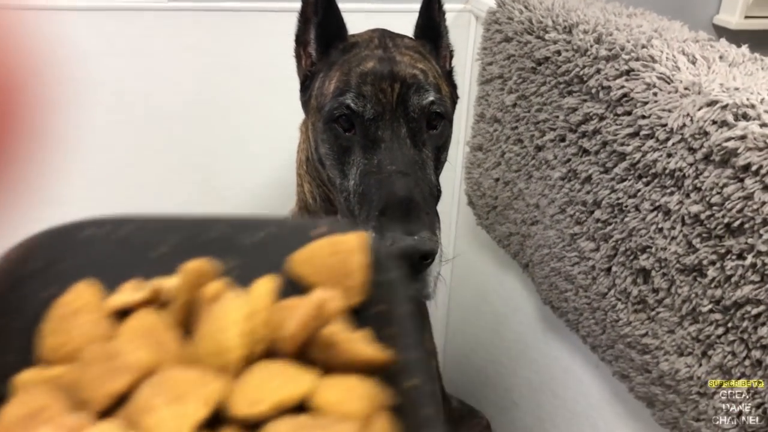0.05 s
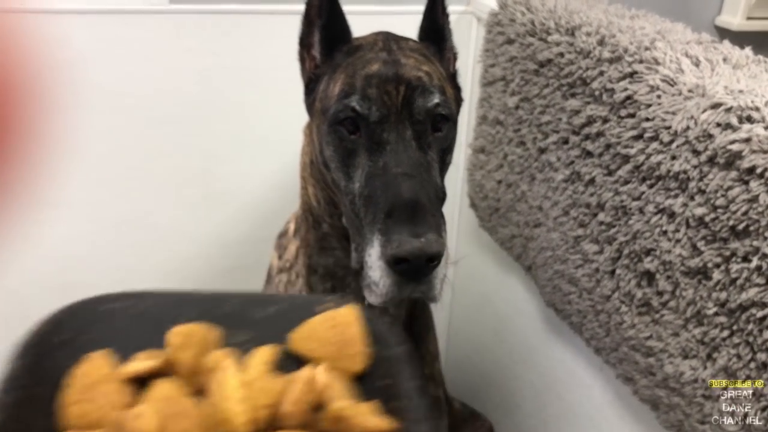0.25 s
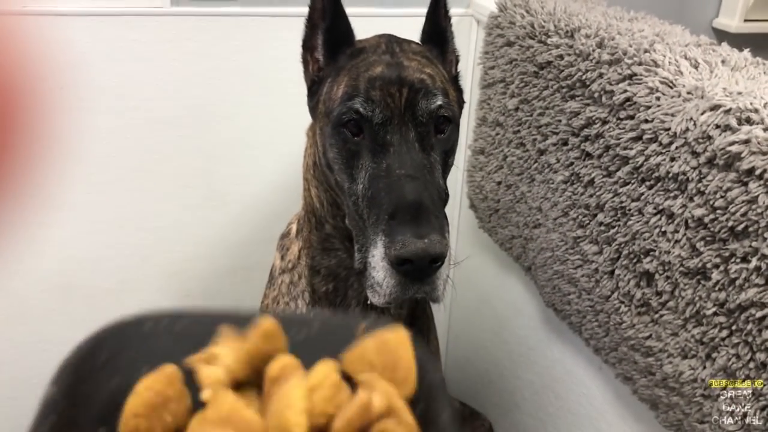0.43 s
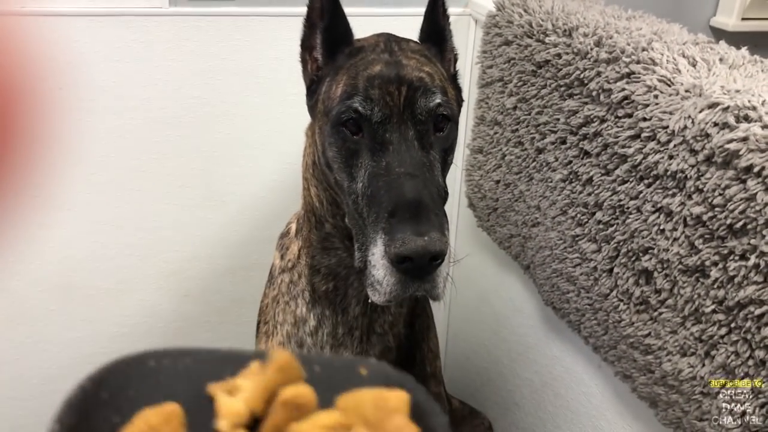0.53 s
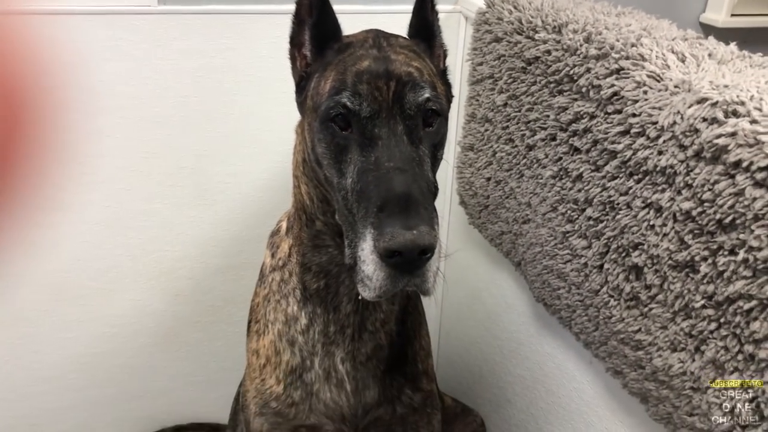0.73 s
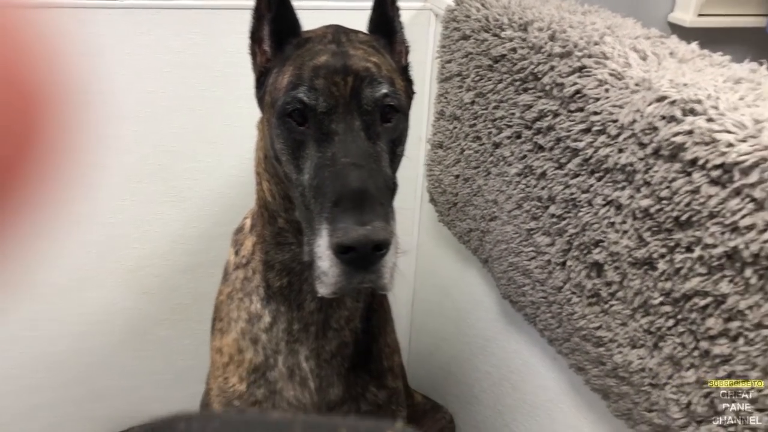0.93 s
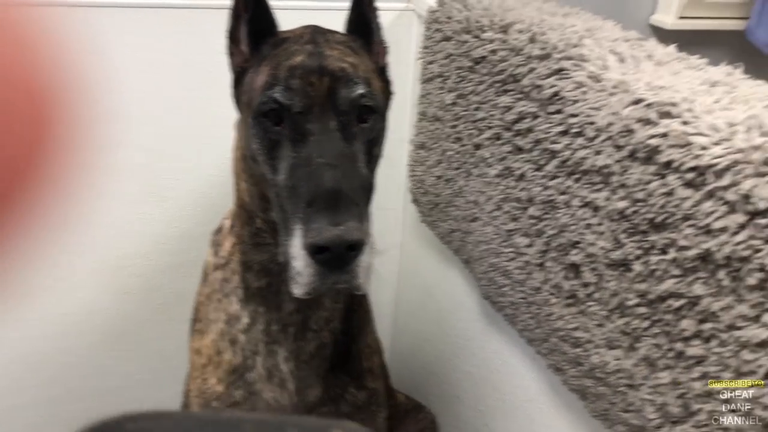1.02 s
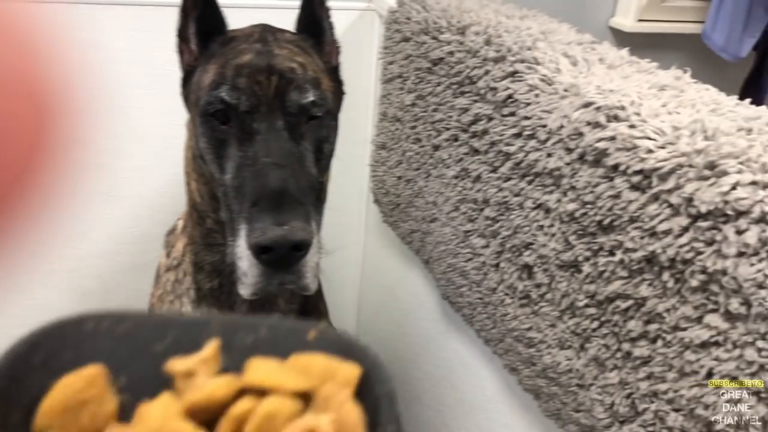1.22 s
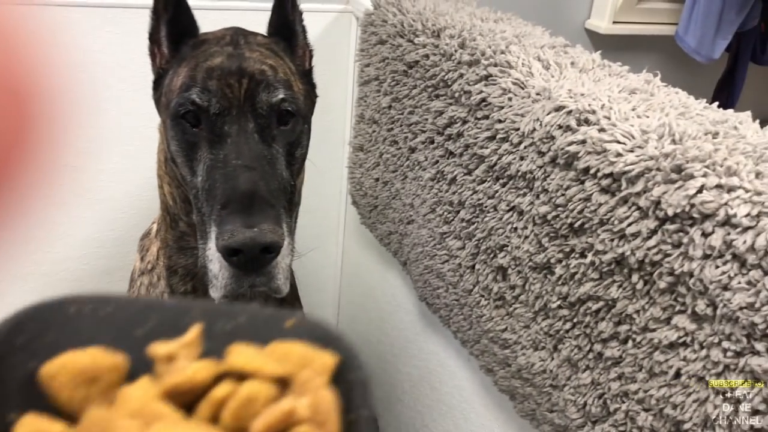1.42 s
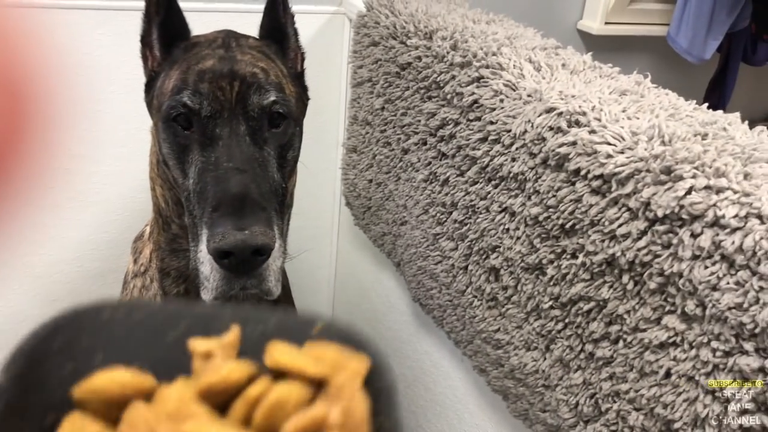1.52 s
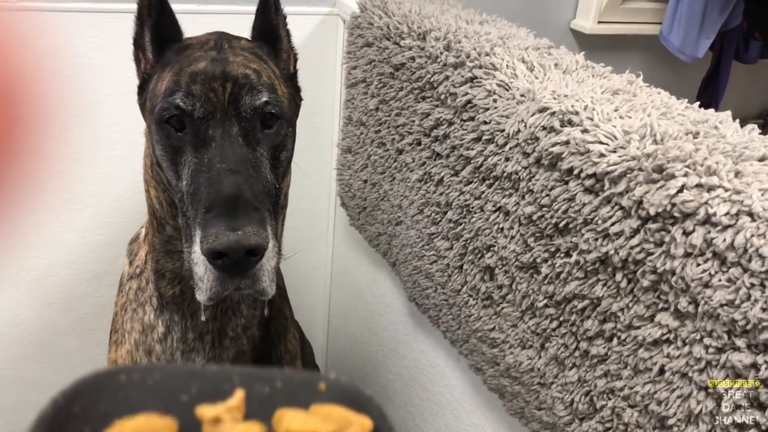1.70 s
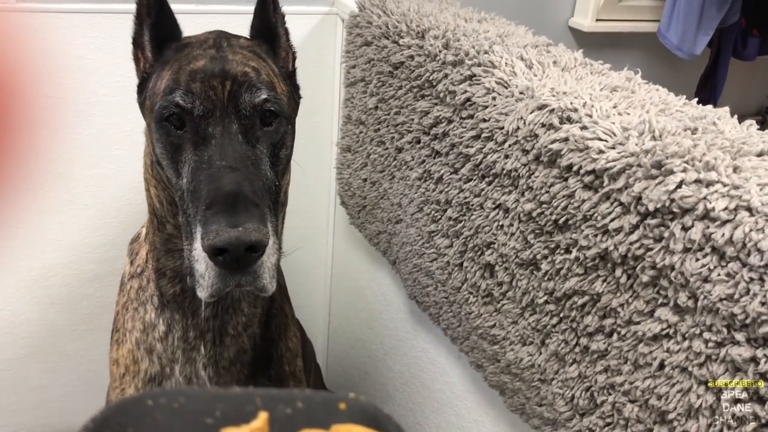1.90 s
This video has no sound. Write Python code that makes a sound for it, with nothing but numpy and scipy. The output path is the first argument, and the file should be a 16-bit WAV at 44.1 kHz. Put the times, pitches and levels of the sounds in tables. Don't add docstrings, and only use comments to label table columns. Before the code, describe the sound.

Hard dry kibble rattles in a plastic scoop, a quick busy burst thinning to scattered knocks.

```python
import sys
import numpy as np
from scipy import signal
from scipy.io import wavfile
from scipy.ndimage import uniform_filter1d

SR = 44100
rng = np.random.default_rng(int(sys.argv[2]) if len(sys.argv) > 2 else 0)


def to_linear_factor(level_db):
    exponent = np.asarray(level_db, float) / 20
    return 10 ** exponent


def persist_wave(psi):
    counts = np.round(np.clip(psi, -1, 1) * 32767).astype(np.int16)
    wavfile.write(sys.argv[1], SR, np.atleast_2d(counts).T)


N = 85995

# (time [s], level [dB], pitch [Hz], swell [cycles])
POURING_KNOCKS = [(0.0896, -31.5, 1284, 0.43), (0.14437, -57.5, 1310, 0.68), (0.17, -59, 1540, 2.6),
                  (0.212, -42.5, 1400, 1.3), (0.2144, -27.5, 1290, 0.72), (0.21516, -41, 920, 1.3),
                  (0.22196, -29.5, 1330, 0.62), (0.2627, -52, 1210, 0.9), (0.302, -39, 1300, 1.9),
                  (0.3046, -43.5, 1700, 2.2), (0.3039, -50, 935, 1.5), (0.30695, -29.5, 1450, 0.42),
                  (0.3161, -41.4, 1110, 0.9), (0.3298, -51, 1100, 1.3), (0.34635, -44, 1540, 1.2),
                  (0.3484, -25, 1213, 1), (0.3483, -39, 950, 1.85), (0.3616, -36.5, 1310, 0.34),
                  (0.364, -37, 1310, 0.58), (0.382, -47, 1700, 1.1), (0.3833, -41, 1430, 1.3),
                  (0.383, -47.0, 1000, 2.0), (0.391, -48.0, 1420, 1.8), (0.407, -34.5, 1530, 1.2),
                  (0.4177, -22.5, 1280, 0.61), (0.41813, -32.5, 970, 1.5), (0.422, -33, 1310, 1.5),
                  (0.434, -38, 1580, 0.66), (0.4396, -31.5, 1600, 0.93), (0.456, -50, 1440, 2.6),
                  (0.46023, -47, 1550, 1.3), (0.4657, -37, 1430, 0.51), (0.4647, -58, 1010, 1.3),
                  (0.4825, -41.5, 1110, 1.07), (0.484, -32, 1750, 0.83), (0.4852, -25.5, 1440, 0.74),
                  (0.48609, -32.5, 966, 1.2), (0.4876, -39, 1540, 0.6), (0.49223, -44, 1080, 3.3),
                  (0.4993, -37, 1450, 1), (0.5205, -36, 1410, 1.8), (0.52158, -41, 910, 2.4),
                  (0.5251, -32, 1320, 0.52), (0.5361, -32.5, 1430, 1.2), (0.5404, -35, 1430, 0.49),
                  (0.5465, -41, 1350, 2.0), (0.5568, -42, 1360, 2.3), (0.566, -56, 1300, 1.4),
                  (0.58206, -41.5, 1700, 0.76), (0.602, -49.5, 1100, 0.42)]
# (time [s], level [dB], pitch [Hz], swell [cycles])
SETTLING_KNOCKS = [(0.6147, -51, 1210, 0.65), (0.6315, -41, 1480, 0.9), (0.6343, -45.5, 1000, 2.9),
                   (0.63394, -36.5, 1310, 0.76), (0.6449, -43, 1110, 0.49), (0.68753, -34, 1010, 0.9),
                   (0.7034, -40.5, 1080, 0.5), (0.7057, -53, 1330, 1.2), (0.734, -57, 1010, 2.0),
                   (0.7552, -33.5, 1300, 0.45), (0.7782, -57, 1220, 2.4), (0.7842, -59, 920, 2.3),
                   (0.8237, -37, 1680, 1.3), (0.8253, -29.3, 1480, 1.3), (0.8278, -34.5, 1450, 0.68),
                   (0.8672, -48.4, 1710, 0.84), (0.8808, -34.5, 1270, 0.75), (0.9061, -41.5, 1200, 1.3),
                   (0.94748, -51.5, 1310, 1.1), (0.9528, -49, 1320, 0.67), (0.9613, -50, 1440, 2.0),
                   (0.9829, -27, 1650, 0.47), (1.00263, -62, 1700, 1.3), (1.02064, -47.0, 1460, 1.1),
                   (1.0246, -42.5, 1310, 0.26), (1.07841, -49.5, 1540, 0.77), (1.1007, -34.5, 1740, 0.33),
                   (1.1049, -39.4, 1620, 0.3), (1.1089, -39.5, 1320, 0.88), (1.1749, -36.5, 1630, 0.86),
                   (1.1749, -38.5, 1076, 0.7), (1.2423, -30.5, 1600, 0.49), (1.246, -42, 1380, 1.4),
                   (1.26399, -53, 1310, 0.65), (1.2895, -45.5, 1590, 1.3), (1.31399, -37, 1145, 0.72),
                   (1.347, -60, 1300, 2.2), (1.3495, -58, 1560, 2.3), (1.3584, -57, 1010, 2.5),
                   (1.3723, -43.5, 1550, 1.3), (1.4607, -36.5, 1270, 0.5), (1.50556, -43.5, 1590, 1.16),
                   (1.5245, -47.5, 1550, 0.3), (1.5592, -59.7, 1330, 2.4), (1.5802, -35.5, 986, 0.62),
                   (1.5812, -32.0, 1405, 1.9), (1.6038, -41, 1410, 0.78), (1.636, -53, 1180, 2.6),
                   (1.64235, -46.5, 1700, 1.3), (1.6464, -51, 1280, 2.4)]
# (time [s], level [dB], pitch [Hz], swell [cycles])
EDGE_RAPS = [(0.08903, -42, 2480, 0.87), (0.28449, -34, 1770, 0.46), (0.30023, -37.5, 5100, 0.47),
             (0.30576, -40.5, 3560, 0.9), (0.38145, -44, 2620, 1.2), (0.41707, -36, 2260, 2.5),
             (0.43148, -24.5, 3230, 0.41), (0.43152, -19.5, 1800, 0.48), (0.43219, -20, 2160, 0.46),
             (0.43919, -23.2, 2000, 0.65), (0.43957, -28.5, 6000, 0.85), (0.43997, -23.5, 2550, 0.38),
             (0.44553, -30, 2020, 0.48), (0.48671, -26.5, 2440, 0.67), (0.51503, -27.5, 2170, 0.33),
             (0.52021, -35, 2560, 1.3), (0.53593, -38.5, 2280, 0.75), (0.5633, -37.5, 1690, 0.26),
             (0.57526, -39.5, 2030, 0.45), (0.58415, -37.5, 2330, 0.59), (0.63112, -40, 3360, 0.71),
             (0.68681, -33, 1910, 0.35), (0.75433, -43.5, 2170, 0.73), (0.8234, -36.5, 3200, 1.3),
             (0.8238, -37, 2230, 2.3), (0.82555, -32, 2610, 1.9), (0.82569, -37, 3330, 2.2),
             (0.82616, -33, 4600, 0.81), (0.83813, -37.5, 2200, 0.38), (0.88131, -42, 2380, 1.9),
             (0.88149, -54, 1700, 1.2), (0.90611, -43, 2640, 0.65), (0.95603, -50, 1850, 0.9),
             (0.98366, -31, 2720, 0.55), (1.17227, -42.5, 1820, 0.65), (1.17354, -47.0, 2400, 2.9),
             (1.24269, -40.5, 2640, 2.5), (1.24589, -32.5, 2800, 0.63), (1.3137, -43, 2460, 1.6),
             (1.37644, -45, 2690, 0.67), (1.50543, -43, 2580, 0.69), (1.58048, -42.5, 2300, 2.9),
             (1.58112, -35, 1855, 1.66), (1.58268, -39.5, 2700, 1.3), (1.64049, -55.2, 1850, 1.7),
             (1.64462, -47, 2850, 0.97), (1.66505, -30.5, 2250, 0.46), (1.6657, -40.5, 2150, 1.06),
             (1.78979, -28.5, 2160, 0.39), (1.79046, -39.9, 2220, 0.4)]
# (time [s], level [dB])
SCRAPE_TICKS = [(0.1674, -49), (0.298, -53), (0.363, -42), (0.3813, -47), (0.4164, -41), (0.43, -52.5),
                (0.439, -46), (0.454, -52), (0.497, -45.5), (0.5045, -55), (0.563, -49), (0.69, -54),
                (0.7, -50), (0.822, -38), (0.8237, -36), (0.9052, -51), (0.9806, -53), (1.591, -52),
                (1.658, -46.5)]


def band(x, hz, width_hz):
    return signal.lfilter(*signal.iirpeak(min(hz, .45 * SR), hz / width_hz, fs=SR), x)


def unit(x):
    return x / np.sqrt(np.mean(x ** 2))


def walk(rate):
    hold = int(SR / rate)
    steps = np.repeat(rng.standard_normal(N // hold + 1), hold)
    return uniform_filter1d(uniform_filter1d(steps, hold), hold)[:N]


def bursts(times, db, rise_s, hz=None):
    swell_power = 2.0
    times, db, rise_s = np.broadcast_arrays(times, db, rise_s * swell_power ** .5)
    first = np.ceil((times - rise_s) * SR).astype(int)
    at = first[:, None] + np.arange(int(7 * rise_s.max() * SR))
    from_peak_s = at / SR - times[:, None]
    u = from_peak_s / rise_s[:, None] + 1
    shape = to_linear_factor(db)[:, None] * (u * np.exp(1 - u)) ** swell_power
    if hz is not None:
        shape = shape * np.cos(2 * np.pi * np.asarray(hz)[:, None] * from_peak_s)
    return np.bincount(np.clip(at, 0, N).ravel(), shape.ravel(), N + 1)[:N]


def room_tone():
    # (pitch [Hz], level [dB per Hz])
    tone_levels = [(40, -8), (80, -4), (200, -9.5), (400, -11.5), (800, -23.5), (3000, -34.5),
                   (16000, -41.5)]
    tone_hz, tone_level_db = np.array(tone_levels).T
    air = 0
    for hz in 45 * 2 ** np.arange(0, 8.6, .5):
        db = np.interp(np.log(hz), np.log(tone_hz), tone_level_db) + 2.13 * walk(8.1)
        noise = band(band(rng.standard_normal(N), hz, hz / 2), hz, hz / 2)
        air = air + to_linear_factor(db) * noise
    hum_level = to_linear_factor(-69.5 + 0.64 * walk(6.2))
    hum_hz = 62.2 * (1 + 0.063 * walk(6.5))
    hum = hum_level * np.sin(2 * np.pi * np.cumsum(hum_hz) / SR)
    return to_linear_factor(-67.5) * unit(air) + hum


def room_echo(near):
    t60_s, centre_hz, width_hz = 0.16, 2480, 6100
    t = np.arange(SR // 2) / SR
    half_turns = np.arange(N) / SR / .23 + np.arange(2)[:, None] / 2
    room = 0
    for share in np.cos(np.pi * half_turns):
        tail = band(rng.standard_normal(len(t)), centre_hz, width_hz)
        tail = tail * to_linear_factor(-60 * t / t60_s) * (t > .004)
        tail = tail / np.sqrt(np.sum(tail ** 2))
        room = room + signal.fftconvolve(near * share, tail)[:N]
    return to_linear_factor(-21) * room


def hand_bumps():
    # (time [s], level [dB], pitch [Hz])
    bump_hits = [
        (0.343, -44.5, 273),
        (0.428, -54, 150),
        (0.765, -45.5, 298),
        (1.408, -48, 96.3),
    ]
    s, db, hz = np.array(bump_hits).T
    return bursts(s, db, 0.49 / hz, hz)


def stirring():
    # (time [s], level [dB])
    shake_levels = [(0, -78), (.15, -71.5), (0.258, -61), (0.308, -55.5), (0.329, -59), (.44, -58.5),
                    (.47, -56.5), (0.57, -55.5), (.61, -65), (.7, -59.5), (.74, -65.5), (.84, -62),
                    (.97, -62), (1.15, -71.5), (1.36, -69), (1.642, -62), (1.72, -70.5), (1.95, -86)]
    nudge_s, power = 0.0046, 0.62
    s, db = np.array(POURING_KNOCKS + SETTLING_KNOCKS + EDGE_RAPS).T[:2]
    nudges = bursts(s, db - 10.5, nudge_s)
    nudges = nudges + bursts(*np.array(SCRAPE_TICKS).T, nudge_s) * to_linear_factor(8)
    shaking_db = np.interp(np.arange(N) / SR, *np.array(shake_levels).T)
    return shaking_db + power * 20 * np.log10(1 + to_linear_factor(50.5) * nudges)


def grains(stir_db, centre_hz, spread, cycles, scatter_db, db, follow, count):
    when, size = rng.random((count, 2)).T
    hz = np.clip(centre_hz * np.exp(spread * rng.standard_normal(count)), 820, 16000)
    loudest_db = stir_db.max()
    level_db = loudest_db + follow * (stir_db[(when * N).astype(int)] - loudest_db)
    extra_db = scatter_db * np.minimum(-np.log(1 - size), 3)
    return bursts(when * N / SR, level_db + db + extra_db, cycles / hz, hz)


def ticks():
    s, db = np.array(SCRAPE_TICKS).T
    centre_hz, width_hz = 12400, 17000
    hiss = band(band(rng.standard_normal(N), centre_hz, width_hz), centre_hz, width_hz)
    return unit(hiss) * bursts(s, db - 13.5, .0008)


def clinks():
    # (time [s], level [dB], pitch [Hz])
    clink_hits = [(0.3458, -35.5, 2300), (0.436, -31, 4100), (0.455, -44, 5170), (0.5416, -37.5, 5170),
                  (0.6233, -56, 4720), (0.762, -51, 4500), (0.8153, -41, 1410), (0.949, -50, 5000),
                  (0.9752, -41.5, 1450), (1.037, -55, 6600), (1.1742, -45.5, 3000), (1.2348, -45.5, 1730),
                  (1.583, -41.5, 3960), (1.6593, -58, 6670)]
    s, db, hz = np.array(clink_hits).T
    return bursts(s, db, 0.69 / hz, hz)


def knocks():
    s, db, hz, cycles = np.array(POURING_KNOCKS + SETTLING_KNOCKS + EDGE_RAPS).T
    rings = bursts(s, db, np.clip(cycles, .2, 3) / hz, hz)
    s, db = np.array(EDGE_RAPS).T[:2]
    crack_hz = 5440 * np.exp(.12 * rng.standard_normal(len(s)))
    cracks = bursts(s - .0002, db - 14, 0.00012, crack_hz)
    return rings + cracks


def scene():
    stir_db = stirring()
    patter = grains(stir_db, centre_hz=1270, spread=0.31, cycles=0.8, scatter_db=4.5, db=-10,
                    follow=1.0, count=2600)
    grit = grains(stir_db, centre_hz=4170, spread=0.38, cycles=1.6, scatter_db=3.5, db=-20.5,
                  follow=0.88, count=5000)
    dust = grains(stir_db, centre_hz=13400, spread=0.42, cycles=1.3, scatter_db=0.87, db=-24,
                  follow=0.71, count=9000)
    hits = knocks() + clinks() + patter
    hits = signal.sosfilt(signal.butter(2, 450, "high", fs=SR, output="sos"), hits)
    near = hits + grit + dust + ticks() + hand_bumps()
    return (near + room_echo(near) + room_tone())[None]


def top_cut(x):
    return signal.sosfilt(signal.butter(12, 16430, fs=SR, output="sos"), x)


def record(dry):
    x = signal.sosfilt(signal.butter(3, 48, "high", fs=SR, output="sos"), dry)
    x = signal.sosfilt(signal.ellip(8, .2, 40, 15700, fs=SR, output="sos"), x)
    return top_cut(x)


dry = scene()
out = record(dry)
persist_wave(out)
```